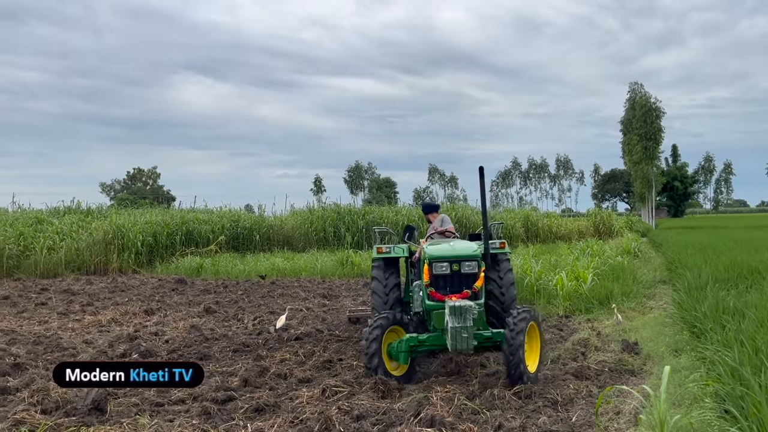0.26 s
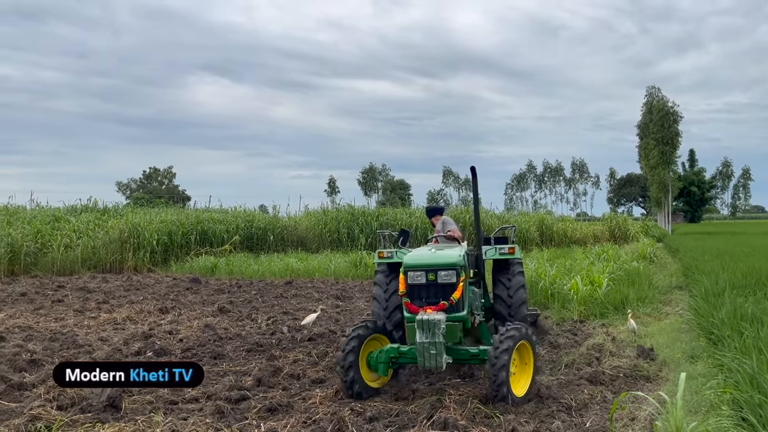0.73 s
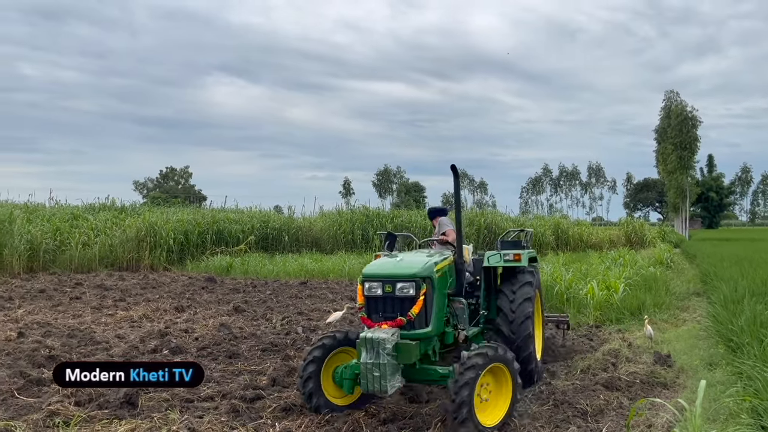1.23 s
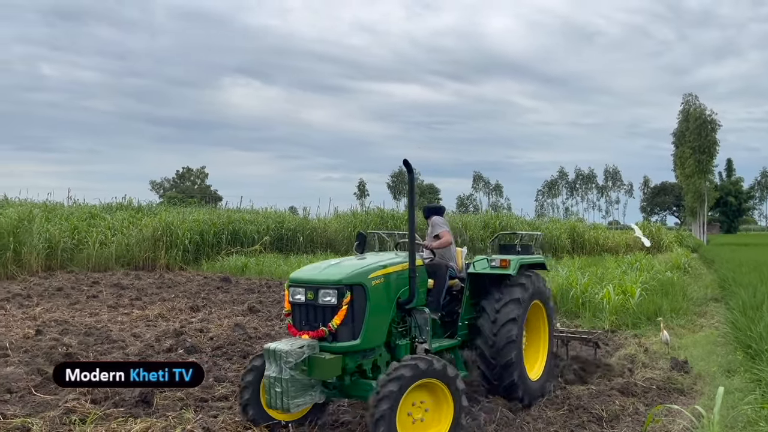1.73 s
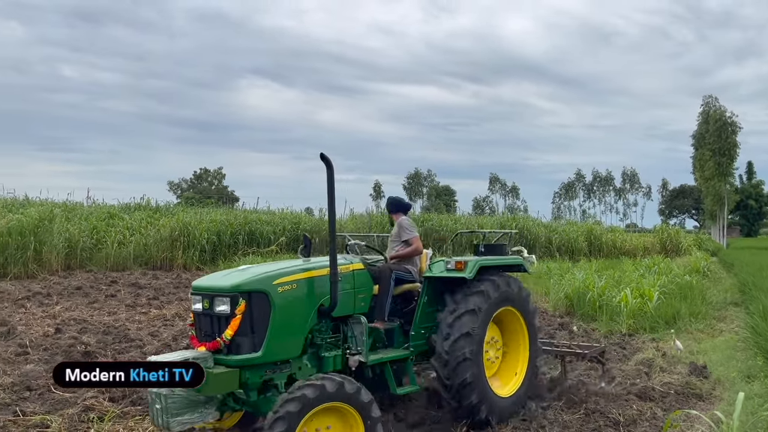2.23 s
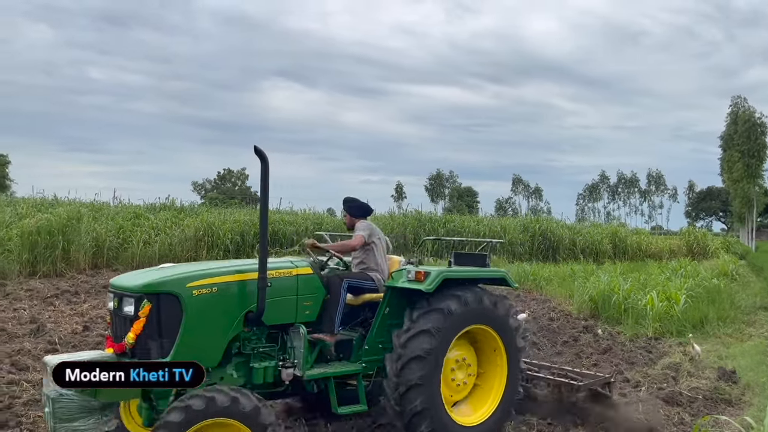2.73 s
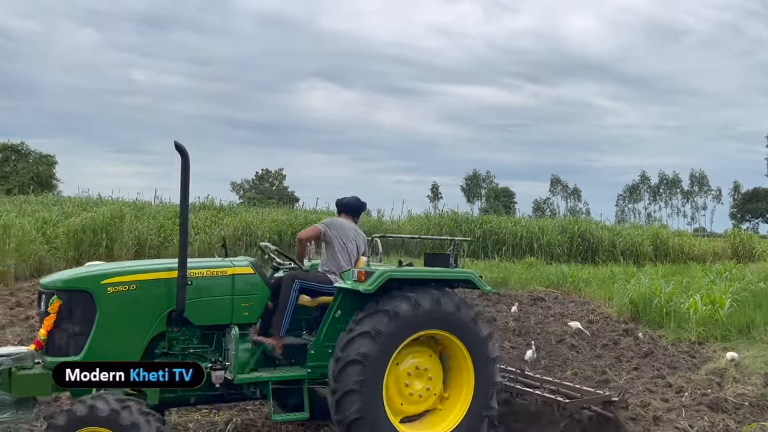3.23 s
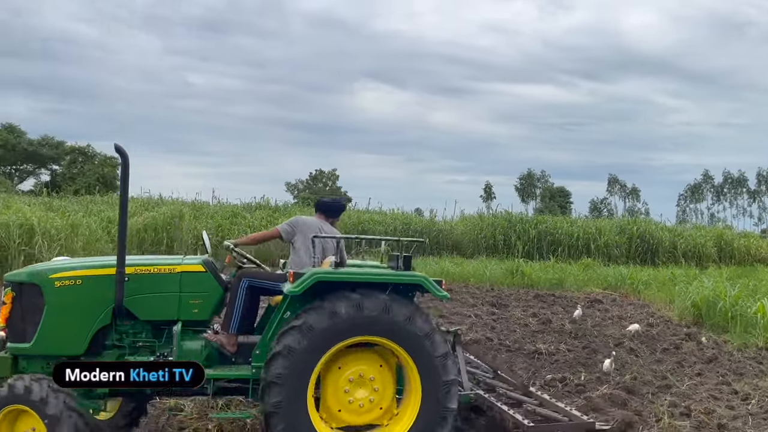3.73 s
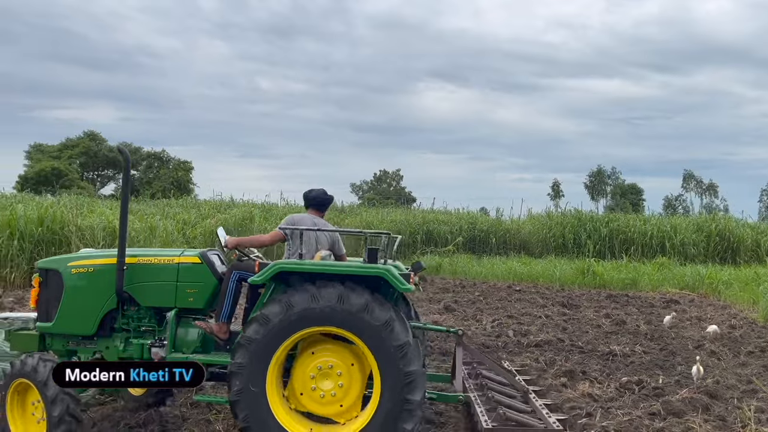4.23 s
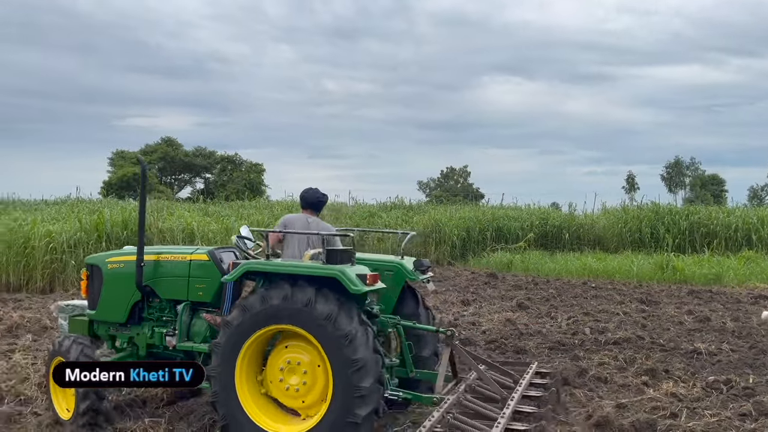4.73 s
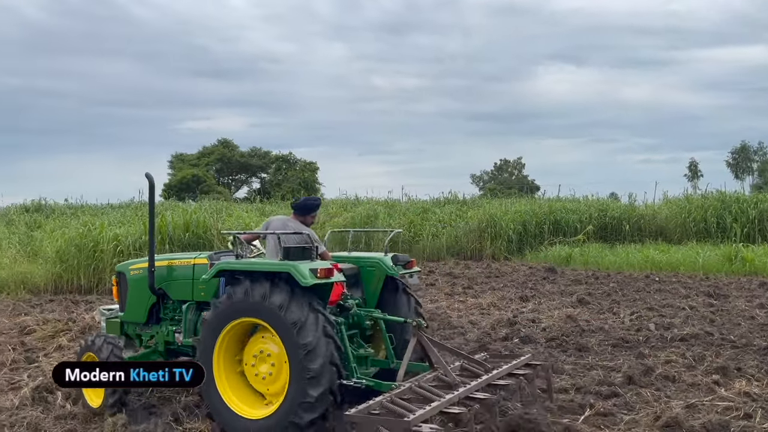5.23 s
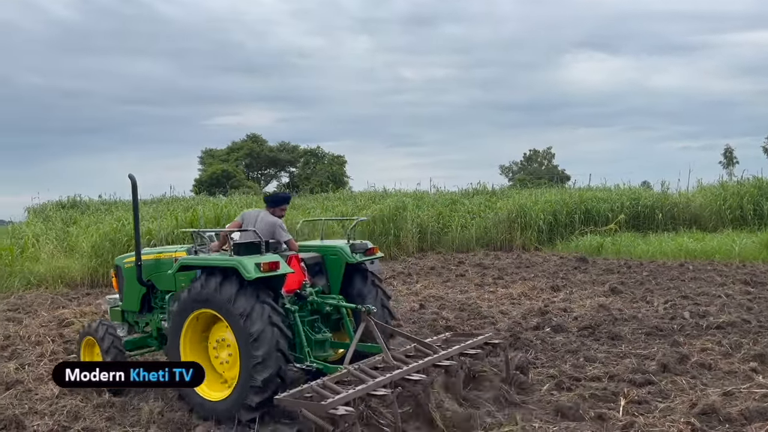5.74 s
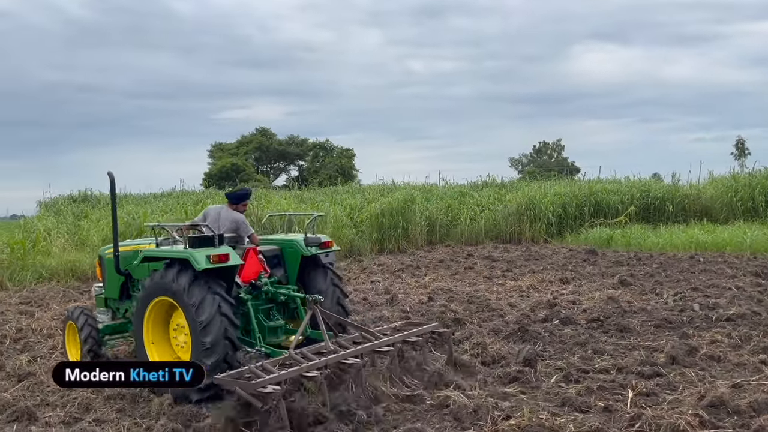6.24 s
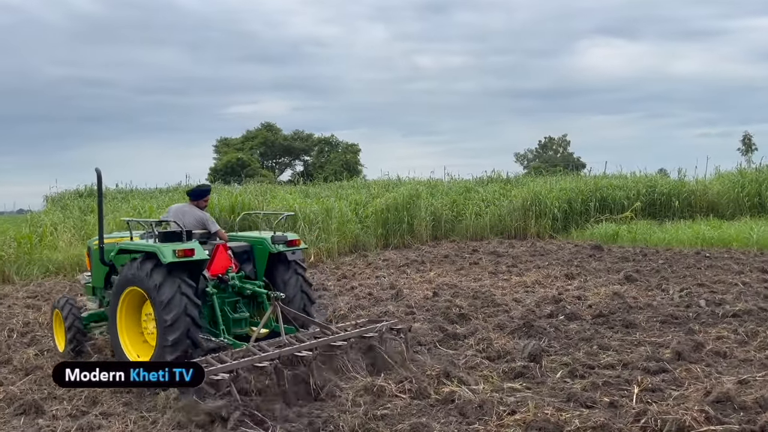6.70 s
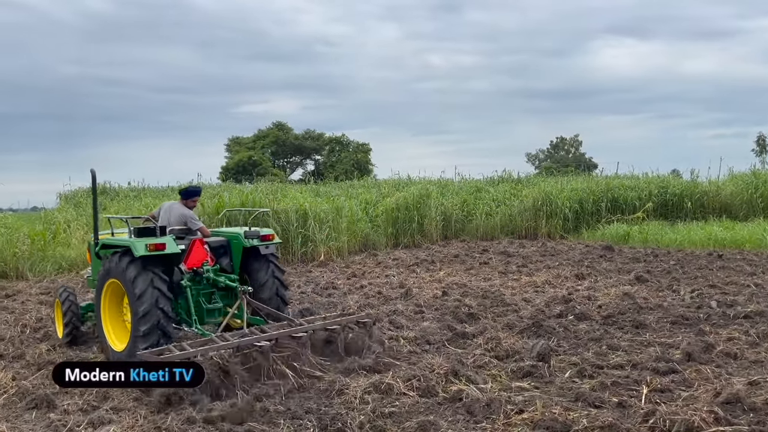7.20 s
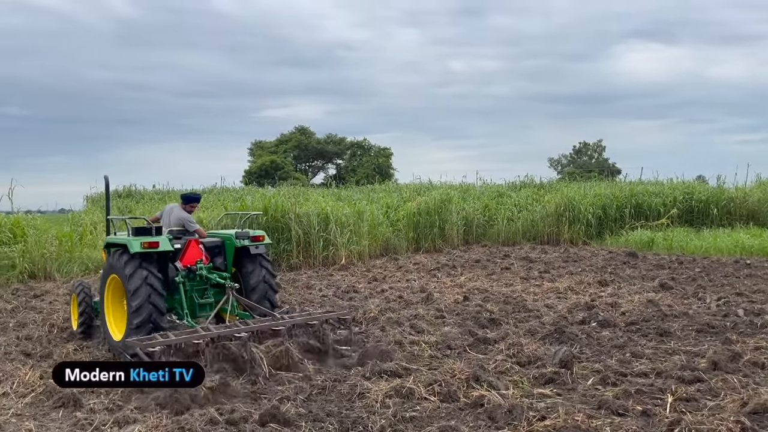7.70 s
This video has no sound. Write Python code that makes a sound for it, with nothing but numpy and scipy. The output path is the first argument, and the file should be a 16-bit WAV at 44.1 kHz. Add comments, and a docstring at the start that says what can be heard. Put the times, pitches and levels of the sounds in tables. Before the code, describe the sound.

A continuous outdoor pass of a diesel tractor dragging a cultivator over soft soil, with a fairly near stereo microphone. It starts with a deep exhaust burst that quickly thins; from 0.4 to 1.3 s hard metallic bonnet clanks and dry valve raps ride on rapid chugging, about thirty firings a second, strongest around 1.2 s. From 1.5 to 3 s the exhaust barks and booms unevenly as the governor hunts, with knock and hiss sagging and returning, bright raps coming in clusters. Broad roar from fan, gears and tines peaks near 3 to 3.4 s while the image widens. Around 3.7 to 6.3 s a low fuzzy drone joins and the engine gradually softens and blurs. From 6.4 s a narrow wavering whine near 1300 Hz appears, with small even ticks from about 6.7 s, over muffled throbbing that is still running, quieter, at 8 s.

```python
"""A three-cylinder diesel tractor, first heard nose on, drags a cultivator over soft soil with hard bonnet
clanks. It turns past the microphone, the stereo view widens and a low fuzzy drone joins from the side and rear.
Last it drives off tail on, softer, with a narrow whine and an even tick. All through, a governor hunts: after
each overshoot of speed it cuts fuel, and exhaust boom, knock and hiss sag together. Fan, gears and tines make a
roar; this filtered noise and the ringing modes also arrive by way of the ground."""
import sys
import numpy as np
from scipy import signal
from scipy.fft import rfft, irfft, next_fast_len
from scipy.io import wavfile
from scipy.ndimage import uniform_filter1d

SR = 44100
rng = np.random.default_rng(int(sys.argv[2]) if len(sys.argv) > 2 else 0)


def write(x):
    x = np.atleast_2d(x).T
    wavfile.write(sys.argv[1], SR, np.round(np.clip(x, -1, 1) * 32767).astype(np.int16))


N = 351036
TIME = np.arange(N) / SR
LONG = next_fast_len(N)  # transform length
# uneven strength of the three exhaust pulses: level_db
CYLINDERS_DB = [-2.5, 0, 0.5]
# one cylinder ignites harder than the others: level_db
KNOCK_CYLINDERS_DB = [2, 0.5, 1.1]
# cavity behind the grille: mode_hz, width_hz
AIR_BOX = (321.5, 145)


def gain_of(db):
    """Level: 20 dB are a factor of ten in pressure."""
    return 10 ** (np.asarray(db) / 20)


def evened(x):
    """Root-mean-square normalization: scales to rms 1."""
    return x / np.sqrt(np.mean(x ** 2) + 1e-20)


def curves(rows):
    """Linear interpolation in time of every column after the first."""
    s, *columns = np.transpose(rows)
    return [np.interp(TIME, s, c) for c in columns]


def over_hz(rows):
    """Interpolation over log frequency of every column, along the bins of the long transform."""
    f, *columns = np.transpose(rows)
    bins = np.log(np.fft.rfftfreq(LONG, 1 / SR) + 1)
    return [np.interp(bins, np.log(f + 1), c) for c in columns]


def noise(spectrum):
    """Spectral shaping: two uncorrelated Gaussian noises of one colour."""
    real, imaginary = rng.standard_normal((2, 2, LONG // 2 + 1))
    bins = (real + 1j * imaginary) * gain_of(over_hz(spectrum)[0])
    return evened(irfft(bins, LONG)[:, :N])


def wander(points):
    """Slow random modulation: normal values joined by straight lines."""
    return np.interp(TIME, np.linspace(0, TIME[-1], num=points), rng.standard_normal(size=points))


def resonate(x, hz, width):
    """Heterodyne resonator: shifts the curve hz down to zero, smooths, and shifts back."""
    turn = np.exp(2j * np.pi * np.cumsum(hz * np.ones(N)) / SR)
    r = np.exp(-np.pi * width / SR)
    return 2 * (turn * signal.lfilter([1 - r], [1, -r], x / turn)).real


def whine(hz, db, width):
    """Narrow-band resonance: noise through one drifting mode, twice."""
    once = resonate(rng.standard_normal((2, N)), hz, width)
    return gain_of(db) * evened(resonate(once, hz, width))


def ring(x, hz, width):
    """Modal response: one fixed second-order resonance, scaled to rms 1."""
    return evened(signal.lfilter(*signal.iirpeak(hz, hz / width, fs=SR), x))


def per_firing(count, spread_db, cylinders_db=CYLINDERS_DB):
    """Cycle-to-cycle variation: strength of each firing is its cylinder's, plus chance."""
    whole = np.floor(count).astype(int) + 3
    chance = spread_db * np.clip(rng.standard_normal(whole.max() + 1), -2, 2)
    return gain_of(chance[whole] + np.take(cylinders_db, whole % 3))


def beat(count, lag, spread_db, sharp, hold, fall, spike=0):
    """Amplitude modulation: jumps at each firing, overshoots by spike, holds, dies over a share of the cycle."""
    jitter = 0.012  # uneven ignition, share of a cycle
    late = np.interp(count, np.arange(300), rng.standard_normal(300)) * jitter
    fired = count - lag - late
    part = fired % 1
    burst = per_firing(fired, spread_db, KNOCK_CYLINDERS_DB) * np.exp(-np.maximum(part - hold, 0) / fall)
    burst = burst * (1 + spike * np.exp(-part / 0.068))
    sharp = np.clip(sharp, 0, 1)  # 0 steady, 1 fully pulsed
    return uniform_filter1d(np.sqrt(1 - sharp + sharp * evened(burst) ** 2), size=24)


def governor(speed):
    """Delayed feedback: speed is seen late and a faster engine gets less fuel; gives levels and excess rate."""
    set_per_s, cut_per_s, lag_s = 31.54, 31.83, 0.14  # wanted firing rate, hard-cut rate, reaction time
    # levels at the set speed as the tractor passes: time_s, boom_db, overtones_db (over the boom), bark_db,
    # knock_db, hiss_db, roar_db, bonnet_crack_db, air_box_thud_db
    at_set_speed = [(0, -9.5, -7, -22, -32.5, -77, -31.5, -43, -31),
                    (.33, -21, -0.5, -33, -37, -42, -28.5, -37, -36),
                    (.6, -17.5, -8, -24, -32.5, -42, -28, -54, -51),
                    (.92, -16.5, -10, -29, -34, -40.5, -27.5, -50, -52),
                    (1.15, -14.5, -6, -27, -30.5, -36.5, -25.5, -46, -51),
                    (1.3, -16.5, -11.5, -28.5, -34.5, -51, -29.5, -43, -35),
                    (1.42, -11.5, -10, -25, -30, -45, -30.5, -46, -33),
                    (1.55, -16.5, -5, -27, -34.5, -41, -27, -45, -37.5),
                    (1.75, -15.5, -6, -22, -31, -40, -25.5, -42, -35),
                    (2.05, -19, -10, -25, -32.5, -41.5, -27, -48, -44),
                    (2.35, -16.5, -13, -22, -33.5, -38, -25, -55, -39),
                    (2.65, -16.5, -10, -23, -35.5, -38, -25, -41, -55),
                    (3.0, -18, -6.5, -20.5, -33, -32, -23.5, -32, -43),
                    (3.35, -19.5, -8, -23, -35, -36.5, -23.5, -35, -53),
                    (3.7, -22.5, -11, -24.5, -35.5, -37, -25.5, -36, -57),
                    (4.05, -23.5, -6, -26.5, -36.5, -36.5, -24.5, -39, -49),
                    (4.4, -23.5, -6.5, -25, -38, -39, -26, -41, -58),
                    (5.1, -24.5, -4.5, -30.5, -40, -42, -27.5, -41, -36),
                    (5.3, -26.5, -2, -36.5, -40.5, -42.5, -29.5, -53, -34),
                    (5.6, -25, -3.5, -35, -41, -44, -29.5, -34, -55),
                    (6.0, -26, -4, -34.5, -41.5, -45, -30, -39, -53),
                    (6.5, -24.5, -2.5, -36.5, -41, -48.5, -30.5, -65, -52),
                    (7.0, -26.5, -4.5, -36, -42.5, -47.5, -31, -41, -40),
                    (7.5, -25.5, -5, -36.5, -44.5, -50, -31, -42, -41.5),
                    (7.96, -28, 0.5, -41, -47, -56, -35, -38, -67)]
    # answer of each level to speed: slope_db per firing/s over the set rate, further drop_db over the cut rate
    responses = [(-0.1, -4.5), (-1.6, 3.5), (2, -6), (-0.5, -3.5), (-1.5, 0.5), (-0.5, 1.1), (-3.5, -18),
                 (-4.5, -2.5)]
    seen = np.interp(TIME - lag_s, TIME, speed)
    over = seen - set_per_s
    cut = np.maximum(seen - cut_per_s, 0)
    levels = [db + slope * over + drop * cut for db, (slope, drop) in zip(curves(at_set_speed), responses)]
    return levels, over


def drone():
    """Narrow-band resonance: a low fuzzy drone from the side and rear."""
    # drifting band: time_s, centre_hz, level_db
    drone_band = [(3.5, 290, -59), (3.85, 296, -35), (4.2, 290, -37.5), (4.55, 295, -37), (4.8, 330, -48),
                  (5.2, 350, -42), (6.0, 348, -38), (6.5, 352, -55)]
    return whine(*curves(drone_band), 44)  # width in Hz


def gears():
    """Tone in narrow-band noise: a wavering whine, perhaps gears, with a broader band above it."""
    # centre of the whine: time_s, pitch_hz, level_db
    gear_tone = [(5.8, 1280, -72), (6.42, 1300, -50), (6.52, 1290, -43), (6.78, 1283, -44.5),
                 (7.15, 1315, -46), (7.28, 1300, -45), (7.5, 1320, -47), (7.7, 1350, -51),
                 (7.96, 1380, -58)]
    # broader band: offset_hz above the whine, width_hz, level_db relative to it
    above_hz, width, shoulder_db = (136, 91, -10)
    fuzz_width_hz, waver_hz = 46, 5
    hz, db = curves(gear_tone)
    tone = np.sqrt(2) * np.sin(2 * np.pi * np.cumsum(hz + waver_hz * wander(160)) / SR)
    shoulder = whine(hz + above_hz, db + shoulder_db, width)
    return shoulder + whine(hz, db, fuzz_width_hz) + gain_of(db) * tone


def pump(count):
    """Order tone and resonance: strokes locked to engine speed inside a fuzzy whine, perhaps a pump."""
    # levels: time_s, housing_db, tone_db
    pump_levels = [(0, -43, -51), (.3, -38, -44), (.95, -45, -35), (1.25, -41, -57), (1.45, -37.5, -36),
                   (1.8, -37, -44), (2.1, -42, -43), (2.45, -46, -44), (2.6, -48, -32.5),
                   (2.93, -36, -33.5), (3.05, -44, -39), (3.3, -54, -48), (4.0, -41, -50), (4.5, -48, -47),
                   (4.85, -38, -52), (5.3, -42, -37.5), (5.7, -40, -46), (6.1, -44, -37), (6.5, -45, -51),
                   (7.05, -36, -38), (7.5, -50, -41), (7.96, -39.5, -43.5)]
    housing_hz, drift_hz, width_hz = 436.2, 3.4, 24.5
    strokes_per_firing, flicker_db = 14, 2.2
    db, tone_db = curves(pump_levels)
    flicker = flicker_db * wander(90)
    housing = whine(housing_hz + drift_hz * wander(40), db, width_hz)
    tone = np.sqrt(2) * np.sin(2 * np.pi * strokes_per_firing * count)
    return housing + gain_of(tone_db + flicker) * tone


def roar(count, sharp, nose, rear):
    """Broadband radiation: the noise of fan, gears and tines, lightly modulated by the firings."""
    # colour nose on: frequency_hz, density_db (relative)
    roar_nose = [(130, -4), (215, -0.5), (259, -7), (394, -4), (437, -30), (484, -7.5), (588, -7.5),
                 (972, -13.5), (1100, -12), (1890, -16), (2500, -19.5), (3250, -14), (4300, -28.5),
                 (6000, -52), (7500, -45), (9000, -120)]
    # colour tail on: frequency_hz, density_db (relative)
    roar_tail = [(130, -2.5), (215, -2), (270, -4), (350, -2), (428, -3), (514, -3.5), (800, -7),
                 (1130, -10.5), (1310, -9.5), (1610, -17), (1800, -15.5), (2170, -22.5), (2500, -27),
                 (3250, -21), (5500, -120)]
    colour = nose * noise(roar_nose) + rear * noise(roar_tail)
    return colour * beat(count, 0.299, 2.5, 0.32 * sharp ** 2, 0.18, 0.16)


def exhaust_hiss(count, sharp):
    """Pulsed flow noise: hiss bursts at each firing, its lower band with a level of its own."""
    # colour: frequency_hz, density_db (relative)
    hiss_colour = [(3500, -48), (5000, -3), (7000, 2.5), (8500, 2.5), (11000, -1), (13500, -8),
                   (15700, -6.5)]
    # level below 7.5 kHz, added to the hiss: time_s, level_db
    low_hiss = [(0, 9), (1.2, 2.5), (1.9, 2), (2.3, -15), (2.7, 0), (3.2, -1), (4.5, -3), (5.5, -5.5),
                (6.5, -4), (7.96, -1)]
    x = noise(hiss_colour)
    low = signal.sosfiltfilt(signal.butter(4, 7500, fs=SR, output="sos"), x)
    x = x + (gain_of(curves(low_hiss)[0]) - 1) * low
    return x * beat(count, 0.32, 3.1, sharp, 0.28, 0.22, spike=0.37)


def injectors(count):
    """Periodic excitation of modes: an even tick, perhaps injectors; each firing favours other modes."""
    # tick clear from behind: time_s, level_db
    tick_level = [(0, -68), (4, -60), (5.5, -71), (6.5, -63), (6.75, -47), (7.1, -47), (7.45, -47.5),
                  (7.7, -59), (7.96, -48)]
    # modes: mode_hz, width_hz, level_db (relative)
    tick_modes = [(2930, 180, 2), (4150, 98, -2), (4600, 160, -5), (5430, 200, -11), (6200, 200, -8)]
    puff = rng.standard_normal((2, N)) * np.exp(-((count - .31) % 1) / 0.14)
    rings = 0
    for hz, width, db in tick_modes:
        strength = per_firing(count - .2, 1.5, KNOCK_CYLINDERS_DB)
        rings = rings + gain_of(db) * strength * ring(puff, hz, width)
    return gain_of(curves(tick_level)[0]) * evened(rings)


def valve_gear(count, sharp, tail):
    """Random impulse excitation: metal ticks, crowded after each firing, each ringing one mode."""
    # modes of block and valve gear: mode_hz, width_hz, nose_on_db, side_on_db, tail_on_db (relative)
    block_modes = [(1778, 27, -1, -3, 4), (2446, 100, -3.5, -13, -1), (2760, 120, -32, -16, -3),
                   (2810, 48, -1, -2, 3.5), (3150, 75, -6.5, 5.5, -6.5), (3480, 34, 0.5, -3.5, 1),
                   (3680, 74, -1.5, 3.5, -4), (3853, 56, 1, -6, -3.5), (4210, 53, -2.5, -4.5, -8),
                   (4640, 240, -10.5, 0, -7.5), (5130, 32, -5.5, -8, -5.5), (6500, 74, 0.5, -22.5, -8.5)]
    ticks_per_s, spread_db = 30, 6  # on each mode; size range
    envelope = beat(count, .3, 0.52, sharp, 0.1, 0.34, spike=1.1)
    chance = envelope ** 2 * ticks_per_s * len(block_modes) / SR
    hit, size, which = rng.random((3, 2, N), dtype=np.float32)
    ticks = (hit < chance) * gain_of(spread_db * size)
    mode = np.floor(which * len(block_modes))
    out = 0
    for k, (hz, width, *db) in enumerate(block_modes):
        level = gain_of(np.interp(2 * tail, range(len(db)), db))
        out = out + level * ring(ticks * (mode == k), hz, width)
    return out / np.sqrt(len(block_modes))


def raps():
    """Damped impact: the loudest raps of the valve gear, a decaying tone and noise band with a treble spit."""
    # raps: start_s, level_db (before the 7 dB cut below), pitch_hz, spit_db
    rap_list = [(0.1923, -27, 2520, -38), (0.2252, -26, 3120, -48), (0.2577, -25, 2740, -44),
                (0.2896, -19, 3490, -46), (0.3584, -25, 3530, -43), (0.3899, -19, 3520, -28),
                (0.4243, -26, 3410, -40), (0.4582, -18, 3470, -29), (0.564, -15, 2710, -36),
                (0.5939, -19, 3800, -35), (0.6293, -22, 3670, -38), (0.6957, -17, 4070, -38),
                (0.7306, -26, 3750, -38), (0.8044, -18, 3570, -32), (0.8972, -14, 3800, -37),
                (0.9316, -21, 3440, -39), (0.9621, -25, 3720, -36), (0.995, -16, 3790, -38),
                (1.0279, -23, 3890, -27), (1.0623, -23, 3070, -35), (1.0918, -23, 2780, -31),
                (1.1232, -19, 3480, -34), (1.1546, -16, 4100, -34), (1.184, -19, 3680, -30),
                (1.5248, -17, 3870, -44), (1.5547, -21, 3640, -34), (1.5926, -21, 3530, -45),
                (1.6201, -18, 3420, -42), (1.6525, -9, 3840, -41), (1.6854, -19, 2780, -42),
                (1.7463, -13, 3570, -37), (1.8066, -18, 3230, -39), (1.8391, -23, 2790, -39),
                (2.1154, -22, 3600, -44), (2.2087, -18, 3600, -37), (2.2416, -15, 3190, -42),
                (2.303, -17, 2890, -33), (2.3389, -16.5, 3000, -40), (2.6767, -13.5, 3380, -31),
                (2.7739, -19, 3350, -30), (2.8069, -16.5, 3080, -31), (2.8722, -20, 2760, -34),
                (2.9061, -19, 2920, -34), (2.9376, -15, 2940, -34), (2.9665, -16, 3000, -26),
                (2.9994, -27, 3150, -38), (3.0603, -19, 3330, -34), (3.4394, -23, 3250, -39),
                (0.4394, -20, 2930, -37), (0.4918, -18, 2800, -29), (0.5144, -22, 3150, -42),
                (0.5274, -24, 3630, -34), (0.5444, -19, 3750, -41), (0.6624, -23, 3670, -38),
                (0.7454, -19, 3730, -46), (0.7632, -23, 2760, -35), (0.8314, -28, 3890, -40),
                (0.8649, -24, 2940, -35), (2.2722, -17, 3220, -40), (2.3944, -26, 3650, -43),
                (2.6194, -21, 3030, -40), (2.6444, -23, 3030, -36), (2.7157, -22, 3670, -37),
                (2.7432, -20, 2970, -34), (2.8424, -22, 3010, -34), (6.5996, -35, 3480, -50),
                (6.6615, -35, 3520, -48), (6.6944, -35, 4600, -45), (6.7942, -32, 3570, -44),
                (6.8271, -31, 3830, -45), (6.859, -32, 3540, -45), (6.9558, -30, 4700, -48),
                (6.9892, -34, 3690, -46), (7.0221, -22, 4000, -46), (7.0536, -31, 3530, -49),
                (7.0865, -31, 4150, -49), (7.1528, -33, 4120, -47), (7.2476, -33, 4150, -49),
                (7.2806, -34, 4200, -49), (7.316, -32, 4190, -51), (7.3434, -29, 4150, -50),
                (7.3783, -32, 4150, -50), (7.4412, -33, 4280, -49), (7.5963, -36, 4000, -52),
                (7.6273, -37, 3530, -51)]
    rap_t60_s, spit_t60_s, rap_db = 0.047, 0.046, -7
    out, t = np.zeros((2, N)), np.arange(1200) / SR
    shape = (1 - np.exp(-t / 0.00032)) * gain_of(rap_db - 60 * t / rap_t60_s)
    treble = signal.butter(3, 7800, "high", fs=SR)
    rattles = rng.standard_normal((len(rap_list), 2, len(t)))
    for (s, db, hz, spit_db), rattle in zip(rap_list, rattles):
        band = evened(signal.lfilter(*signal.butter(2, [0.885 * hz, 1.13 * hz], "band", fs=SR), rattle))
        spit = evened(signal.lfilter(*treble, rattle)) * gain_of(spit_db - 60 * t / spit_t60_s)
        rap = gain_of(db) * shape * (np.sin(2 * np.pi * hz * t) + 0.67 * band)
        out[:, round(s * SR):][:, :len(t)] += rap + spit
    return out


def clanks():
    """Struck modes: hard knocks ring two panel tones and a slower air-box thump under a noisy strike."""
    # hardest knocks under load: start_s, strike_db (before the 13 dB cut below), air_box_db,
    # lower_panel_db, lower_panel_hz, upper_panel_db, upper_panel_hz
    clank_list = [(0.393, -15, -38, -32, 606, -32.5, 972), (0.426, -21, -26, -35, 649, -44, 770),
                  (0.46, -14, -26, -32, 592, -36, 762), (0.495, -12, -35, -36, 587, -38, 980),
                  (0.529, -18, -31, -39, 452, -33, 800), (0.565, -16, -38, -32, 674, -35, 977),
                  (0.597, -24, -30, -38, 592, -41, 1020), (0.631, -20, -28, -45, 452, -32, 934),
                  (0.665, -24, -29, -45, 452, -37, 885), (0.698, -20, -35, -37, 664, -32, 945),
                  (0.731, -20, -26, -34, 598, -34, 982), (0.766, -16, -32, -37, 730, -29, 912),
                  (0.798, -14, -34, -38, 656, -30, 860), (0.833, -18, -28, -33, 643, -33, 912),
                  (0.865, -20, -32, -35, 662, -29, 900), (0.899, -20, -35, -36, 638, -36, 842),
                  (0.933, -11, -31, -31, 511, -31, 955), (0.966, -19, -32, -33, 544, -40, 969),
                  (0.998, -12, -43, -41, 503, -34, 875), (1.03, -12, -21.5, -28, 579, -26, 900),
                  (1.063, -18, -34, -20.5, 545, -27.5, 837), (1.093, -15, -27.5, -27, 526, -25, 890),
                  (1.125, -12, -27.5, -29, 452, -34, 1000), (1.156, -11, -29, -25, 620, -27, 855),
                  (1.186, -8, -35, -31, 641, -25.5, 830), (1.217, -5, -24.5, -24, 550, -33, 797),
                  (1.246, -12, -30.5, -28, 450, -39, 845), (4.045, -19, -32, -37, 694, -40, 770)]
    panel_t60_s, thump_t60_s, thump_rise_s = 0.02, 0.069, 0.002
    clack_db, clack_t60_s = -13, 0.014
    out, t = np.zeros(N), np.arange(2000) / SR

    def struck(hz, rise_s, t60):
        """Damped oscillation with a soft start, rms 1 over the first 20 ms."""
        tone = (1 - np.exp(-t / rise_s)) * gain_of(-60 * t / t60) * np.sin(2 * np.pi * hz * t)
        return tone / np.sqrt(np.mean(tone[:SR // 50] ** 2))

    strikes = rng.standard_normal((len(clank_list), len(t)))
    strikes = signal.lfilter(*signal.butter(2, 4500, fs=SR), strikes)
    for (s, db, box_db, low_db, low_hz, high_db, high_hz), strike in zip(clank_list, strikes):
        tones = gain_of(low_db) * struck(low_hz, 0.00093, panel_t60_s)
        tones = tones + gain_of(high_db) * struck(high_hz, 0.001, panel_t60_s)
        tones = tones + gain_of(box_db) * struck(AIR_BOX[0], thump_rise_s, thump_t60_s)
        clack = gain_of(db + clack_db - 60 * t / clack_t60_s) * evened(strike)
        out[round(s * SR):][:len(t)] -= tones + clack
    return out


def bonnet(count, crack_db, thud_db):
    """Impulse response of panels: each ignition is a blow plus brief rattle; every blow favours other modes."""
    # panel modes: mode_hz, width_hz, level_db (relative)
    panel_modes = [(520, 190, -10.5), (720, 490, -8.5), (867, 36, -17)]
    # one cylinder thumps the air box hardest: level_db
    thud_cylinders_db = [1.5, 0, 2.5]
    blow = -np.diff(np.floor(count - .38), prepend=-1)
    rattle = 1.14 * rng.standard_normal((2, N)) * beat(count, 0.367, 0.46, 0.65, 0.029, 0.045)
    slap = evened(blow) + rattle
    rings = 0
    for hz, width, db in panel_modes:
        mode = ring(ring(slap, hz, width), hz, 2 * width)
        rings = rings + gain_of(db) * per_firing(count - .3, 2.5) * mode
    strength = uniform_filter1d(per_firing(count - .25, 1.5, thud_cylinders_db), 100)
    thud = strength * ring(ring(slap, *AIR_BOX), *AIR_BOX)
    return gain_of(crack_db) * evened(rings) + gain_of(thud_db) * thud


def knock(count, sharp, nose, rear, tail):
    """Combustion noise: each ignition shakes the block, heard as pulsed noise with ticks of the valve gear."""
    # block heard through the grille: frequency_hz, density_db (relative)
    knock_nose = [(760, -3.5), (1300, -15), (1490, -2), (1800, -4), (1970, -14), (2370, 5.5), (2610, -16),
                  (2850, 5), (3110, -11), (3790, 0.5), (5630, -12), (6120, -10.5), (7000, -11.5),
                  (9100, -65), (15400, -120)]
    # block heard past the rear wheels: frequency_hz, density_db (relative)
    knock_tail = [(760, -16), (1300, 0), (1610, -1.5), (1750, -11), (2160, -30), (2470, -0.5), (3200, -9.5),
                  (4190, -5.5), (6520, -16), (7000, -37), (9100, -56), (15400, -120)]
    colour = nose * noise(knock_nose) + rear * noise(knock_tail)
    pulsed = colour * beat(count, 0.259, 1.4, 0.68 * sharp ** 0.8, 0.42, 0.6, spike=0.25)
    return pulsed + gain_of(0.04) * valve_gear(count, sharp, tail)


def exhaust(count, boom_db, upper_db, bark_db):
    """Fourier synthesis: engine orders line up into one pulse per firing; unequal pipes add orders in between."""
    # stack: camshaft_order, level_db (relative)
    boom_orders = [(4, 30), (5, 27), (6, 48), (7, 31.5), (8, 33.5)]
    # overtones of the stack: camshaft_order, level_db (relative)
    upper_orders = [(9, 6.5), (12, -3)]
    # silencer: camshaft_order, level_db (relative)
    bark_orders = [(15, 5.5), (17, -46), (18, 2.5)]
    # after-ring of the silencer: camshaft_order, level_db (relative)
    late_orders = [(12, 1), (14, -3.5), (16, 4), (21, -8), (22, -17)]
    # turbulence in the stack: frequency_hz, density_db (relative)
    rumble = [(15, -30), (28, -7), (40, 11.5), (60, 12), (130, -11), (200, -28), (260, -26.5)]
    # orders that swell and fade as the stack turns: camshaft_order
    swelling = [5, 7, 12, 15, 16]
    # their swell: time_s, then added_db for each of those orders
    order_swell = [(0, -2, -11, -1, -3.5, -3), (1, 13, -2, 2, 0.5, 2), (1.8, 6, -4, -0.5, 0, 0.5),
                   (2.6, 3, 1, 1.5, -0.5, 3), (3.0, 1, -4, 0.5, -1.5, -7), (3.8, 9, -11, 0, 4.5, 4),
                   (4.6, -4, -11, -6.5, -3.5, -4.5), (5.0, 3, 5, 0.5, -0.5, -1.5), (5.8, -6, 1, -5, 3, 3),
                   (6.5, 5, -14, 0, -20, 3.5), (7.96, 5, 4, 2, -14, -1.5)]
    # brief dips of the boom: centre_s, added_db
    dips = [(.67, -2), (.86, -2), (1.66, -5), (2.45, -7), (2.62, -10), (2.8, -6), (3.67, -10), (4.25, -1),
            (6.48, -3), (7.65, -3), (7.88, 0)]
    rumble_db, dip_s = -15, 0.017  # under the boom; half length of a dip
    waver_db, waver_per_s = 1.8, 16
    turns, swell = count - .65, dict(zip(swelling, curves(order_swell)))

    def stack(orders, lead):
        """Sum of harmonics, scaled to rms 1 before the swell."""
        lines = 0
        for k, db in orders:
            phase = 2 * np.pi * round(k) * turns / len(CYLINDERS_DB) + lead
            lines = lines + gain_of(db + swell.get(round(k), 0)) * np.cos(phase)
        return lines / np.sqrt(sum(gain_of(2 * db) / 2 for k, db in orders))

    # boom, overtones and bark each waver on their own
    knots = np.arange(0, TIME[-1] + 1, 1 / waver_per_s)
    pairs = rng.standard_normal((len(knots), 2, 3)).T
    low, high, top = (gain_of(waver_db * np.array([np.interp(TIME, knots, c) for c in pair])) for pair in pairs)
    boom = low * stack(boom_orders, 0.84) + high * gain_of(upper_db) * stack(upper_orders, 0.43)
    boom = boom * uniform_filter1d(per_firing(turns + 0.37, 1.2), 300)
    boom = boom + gain_of(rumble_db) * noise(rumble)
    bark = stack(bark_orders, 0.23) + gain_of(-1.5) * stack(late_orders, 1.37)
    bark = np.sqrt(top) * bark * uniform_filter1d(per_firing(turns + 0.76, 0.25), 300)  # root halves the waver
    boom_db = boom_db + sum(db * np.exp(-((TIME - s) / dip_s) ** 2) for s, db in dips)
    return gain_of(boom_db) * boom + gain_of(bark_db) * bark


def ground(x, detour_ms, share):
    """Ground reflection: soft soil returns a later, inverted and duller copy."""
    dull = signal.lfilter(*signal.butter(1, 4000, fs=SR), x)
    return x - share * np.array([np.interp(TIME - detour_ms / 1000, TIME, c) for c in dull])


def ports(direct, other, wide):
    """Mid-side stereophony: colours of the microphone ports; the side changes as the tractor fills the view."""
    # ports: frequency_hz, narrow_side_over_mid_db, wide_side_over_mid_db, side_copy_of_mid (0-1), lead_rad
    port_colours = [(60, -32, -19.5, 0.28, 1.8), (290, -44, -14.5, 0, 1.7), (780, -45, -7, 0.88, 0.76),
                    (1660, -5, 2, 1, 1.64), (1750, -35, -6.5, .7, 1.5), (2380, -22, -5, 0.98, 1.38),
                    (3750, -37, 2, 0.59, 0.87), (5000, -7, -2.5, 0.4, -0.85), (6670, 0, -3.5, .6, -1.8),
                    (7464, -5, 4, .3, -0.96), (8190, 21, 87, .3, -1.5), (9070, 5.5, 8.5, 0.21, 1.6),
                    (10800, -6, -8.5, .3, 1.5), (12100, -20, -20, 0, 0), (12900, -14, -12, 0, 0),
                    (13800, -1, -7, .2, -1.5), (14700, 16, 26, 0, 0), (15700, 30, 30, 0, 0)]
    narrow_db, wide_db, copy, lead = over_hz(port_colours)
    copy, mid = np.clip(copy, 0, 1), rfft(direct, LONG)
    spread = np.exp(1j * lead) * (copy * mid + np.sqrt(1 - copy ** 2) * rfft(other, LONG))
    out = 0
    for db, weight in (narrow_db, 1 - wide), (wide_db, wide):
        share = 1 / np.sqrt(1 + gain_of(2 * db))  # mid and side split one power
        m = irfft(mid * share, LONG)[:N]
        s = irfft(spread * share * gain_of(db), LONG)[:N]
        out = out + weight * np.array([m + s, m - s])
    return out


def scene():
    """Superposition: all sources add, the engine's periodic ones on one count of firings."""
    # engine speed as heard: time_s, firings_per_s
    engine_speed = [(0.0, 33.41), (0.42, 29.2), (0.99, 30.27), (1.26, 33.92), (1.56, 30.39), (1.89, 33.48),
                    (2.13, 31.37), (2.43, 33.0), (2.67, 30.72), (3.1, 32.1), (3.28, 31.42), (3.77, 32.28),
                    (4.12, 30.24), (4.56, 32.56), (4.88, 30.11), (5.11, 33.58), (5.35, 31.04),
                    (5.46, 32.28), (6.18, 31.13), (6.3, 33.08), (6.65, 30.11), (7.96, 32.44)]
    # stance of the tractor: time_s, tail_on (0 nose on, 1 tail on), ground_detour_ms, ground_share,
    # view_spread (held to 0-1)
    stance = [(0, 0.039, 1.8, 0.074, 0.15), (1.1, 0.13, 2.27, 0.06, 0.2), (1.9, 0.23, 2.6, 0.1, 0.5),
              (2.8, 0.29, 2.27, 0.033, 0.69), (3.5, 0.69, 2.05, 0.21, 0.98), (4.5, 0.81, 1.96, 0.16, 0.91),
              (5.3, 0.86, 1.72, 0.23, 0.82), (6.6, 1, 1.74, 0.19, 1.13), (7.96, 0.79, 1.71, 0.37, 1.1)]
    speed = curves(engine_speed)[0]
    count = np.cumsum(speed) / SR
    levels, over = governor(speed)
    boom_db, upper_db, bark_db, knock_db, hiss_db, roar_db, crack_db, thud_db = levels
    tail, detour_ms, share, wide = curves(stance)
    tail = np.clip(tail, 0, 1)
    nose, rear = np.sqrt(1 - tail), np.sqrt(tail)  # equal-power fade
    sharp = 1 - 0.11 * over - 0.6 * tail  # the beat blurs at excess speed and when turned away
    body = gain_of(roar_db) * roar(count, sharp, nose, rear)
    body = body + gain_of(knock_db) * knock(count, sharp, nose, rear, tail)
    body = body + injectors(count) + raps() + clanks() + bonnet(count, crack_db, thud_db)
    body = ground(body, detour_ms, share) + drone() + gears() + pump(count)
    air = body + gain_of(hiss_db) * exhaust_hiss(count, sharp)
    air = air + exhaust(count, boom_db, upper_db, bark_db)
    return ports(*air, np.clip(wide, 0, 1))


def record(dry):
    """Low-pass filtering: the band limit of the recorder."""
    edge_hz = 15725
    lowpass = signal.firwin(511, edge_hz, window=("kaiser", 9), fs=SR)
    return signal.oaconvolve(dry, lowpass[None], "same")


dry = scene()
out = record(dry)
write(out)
```